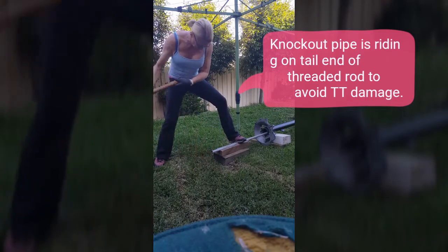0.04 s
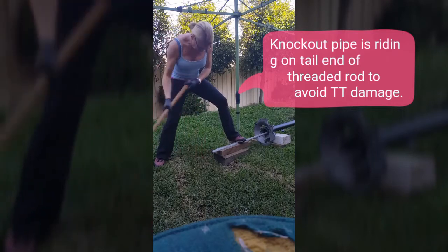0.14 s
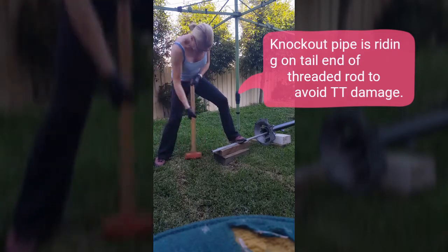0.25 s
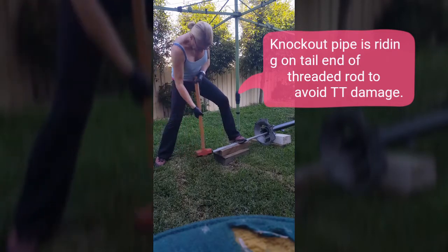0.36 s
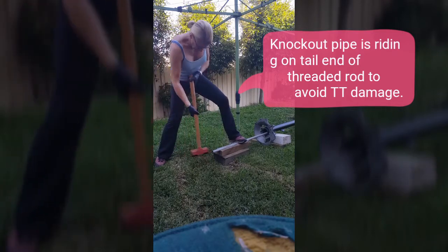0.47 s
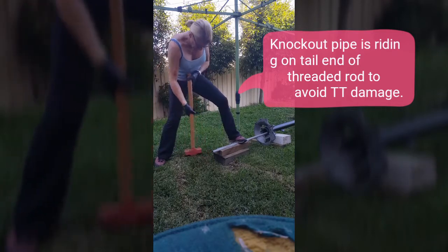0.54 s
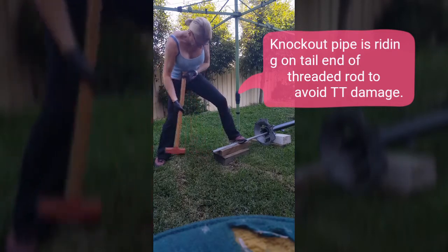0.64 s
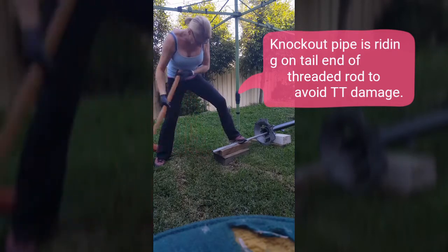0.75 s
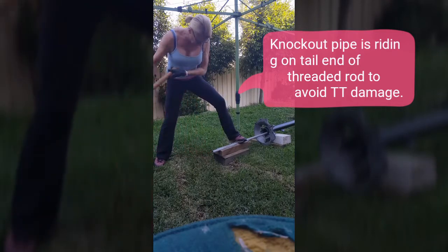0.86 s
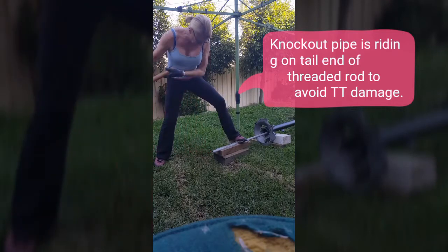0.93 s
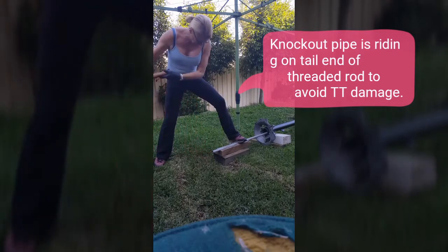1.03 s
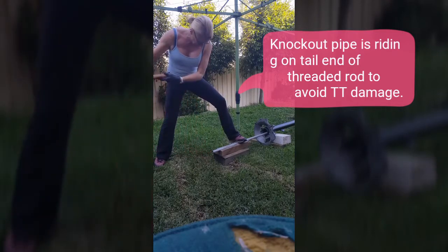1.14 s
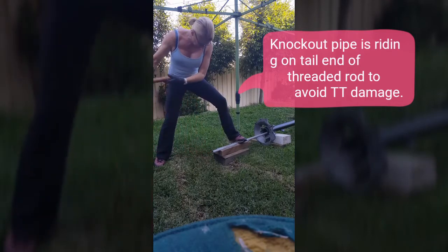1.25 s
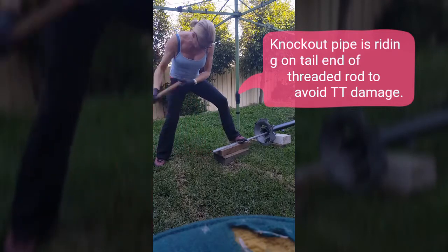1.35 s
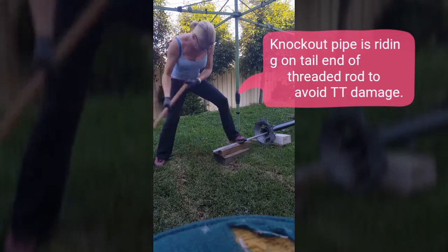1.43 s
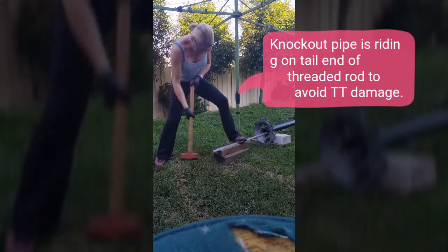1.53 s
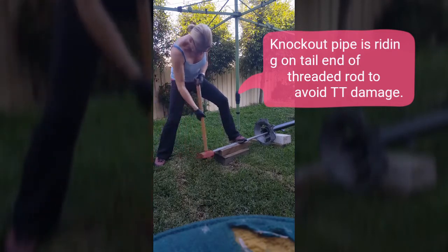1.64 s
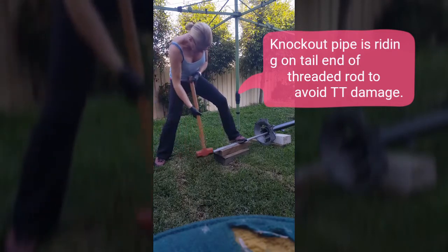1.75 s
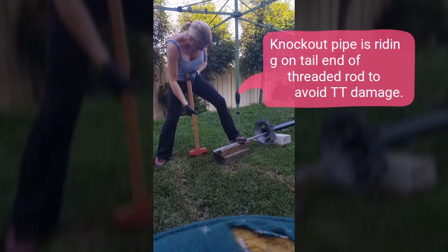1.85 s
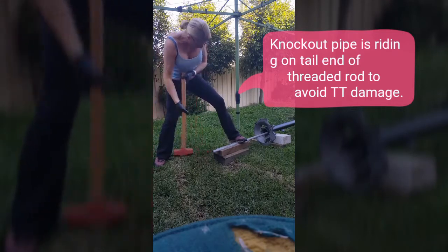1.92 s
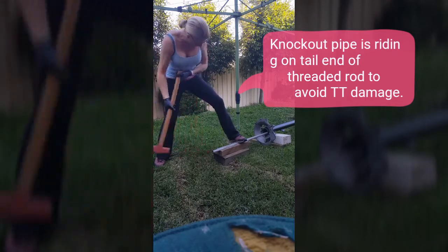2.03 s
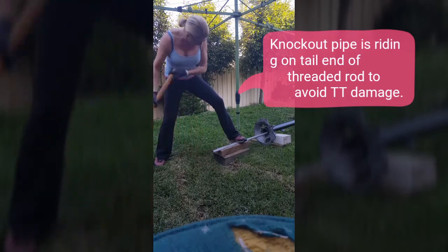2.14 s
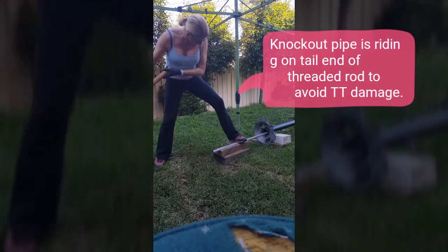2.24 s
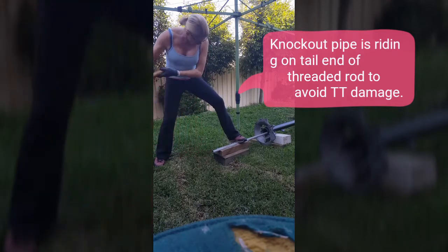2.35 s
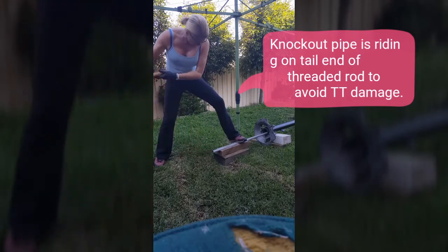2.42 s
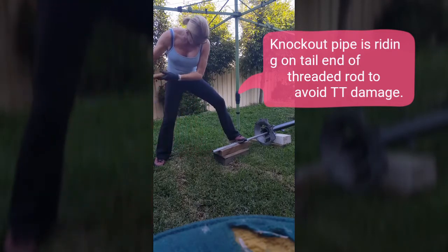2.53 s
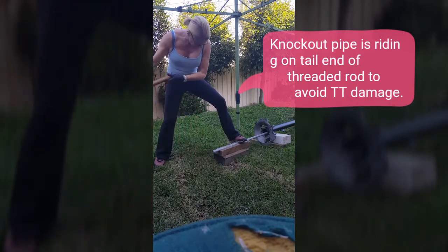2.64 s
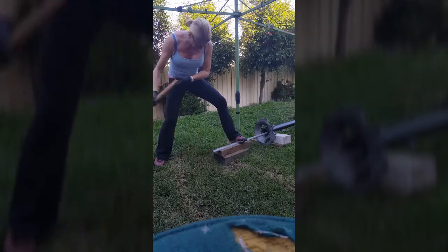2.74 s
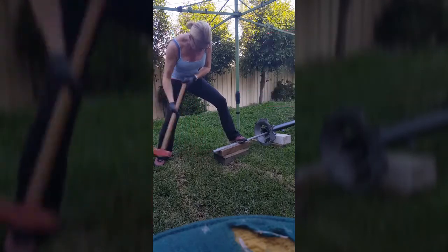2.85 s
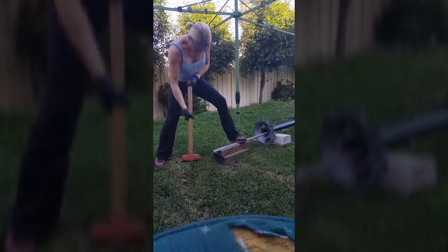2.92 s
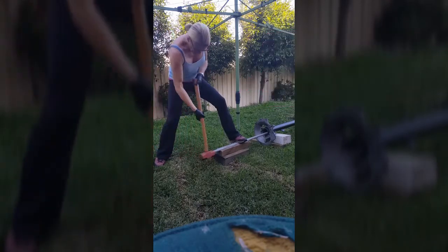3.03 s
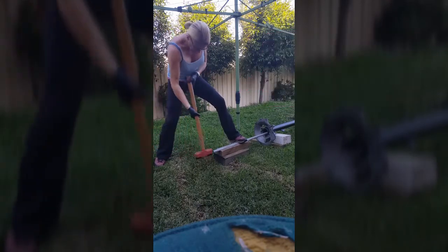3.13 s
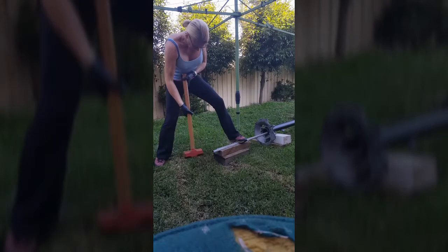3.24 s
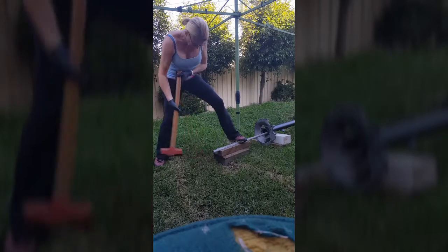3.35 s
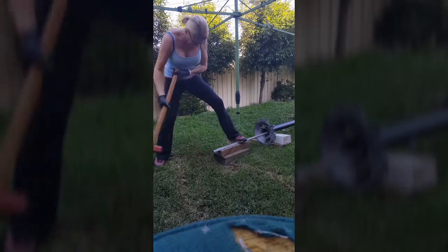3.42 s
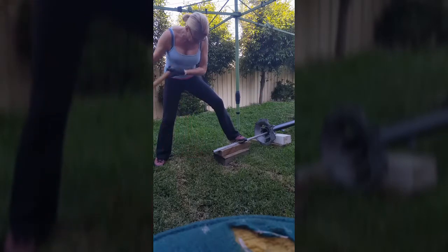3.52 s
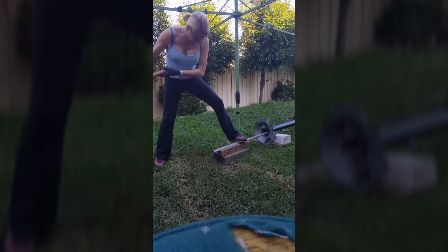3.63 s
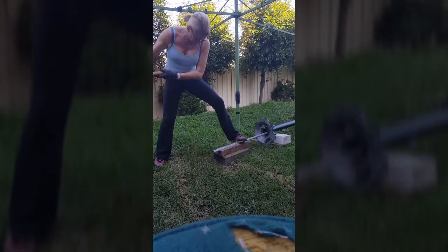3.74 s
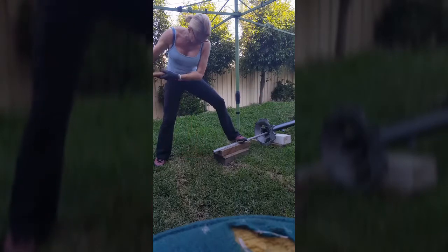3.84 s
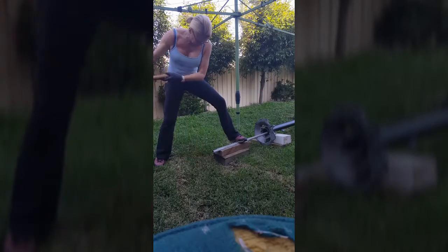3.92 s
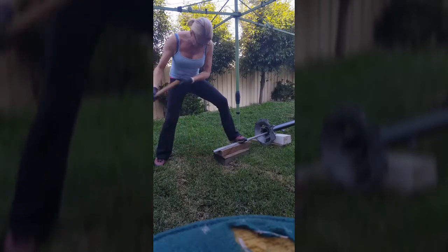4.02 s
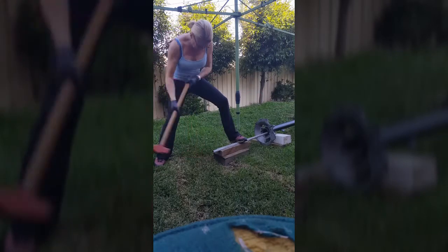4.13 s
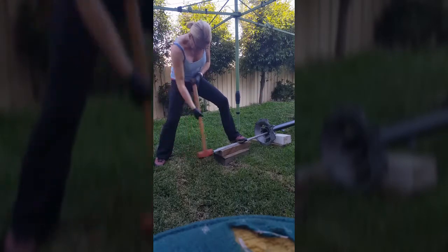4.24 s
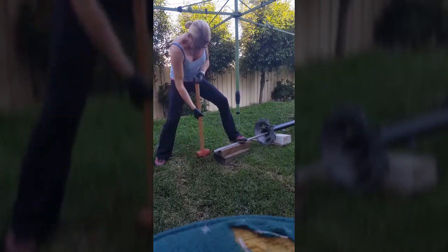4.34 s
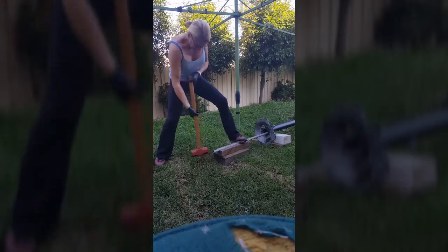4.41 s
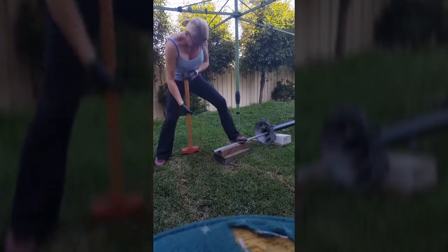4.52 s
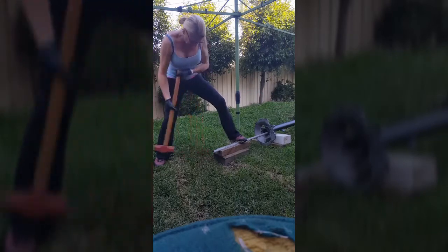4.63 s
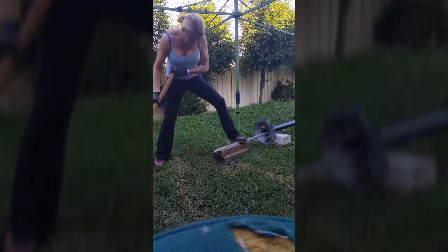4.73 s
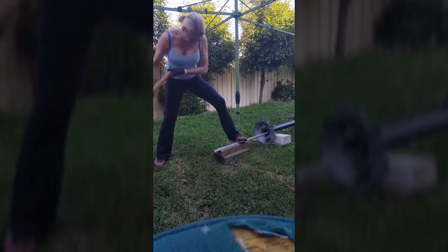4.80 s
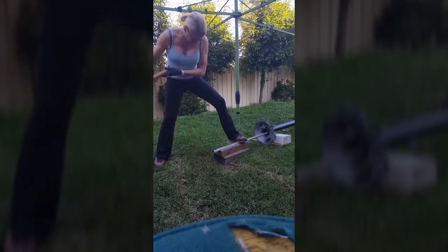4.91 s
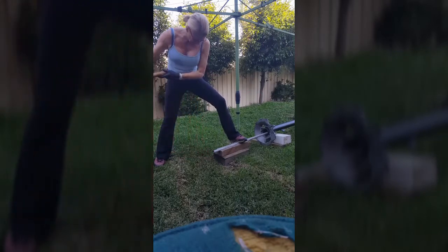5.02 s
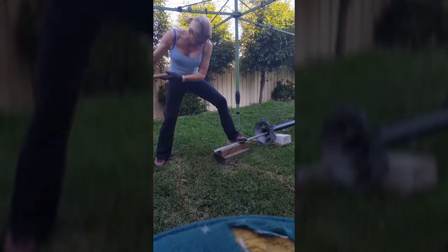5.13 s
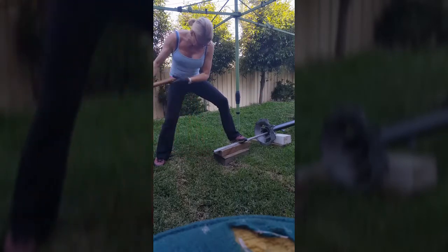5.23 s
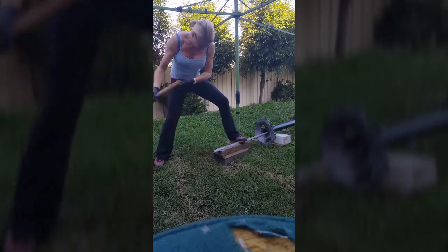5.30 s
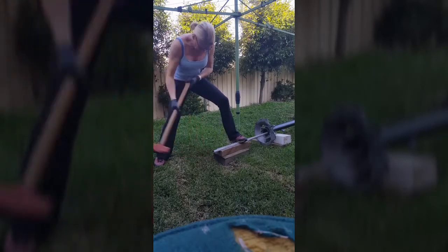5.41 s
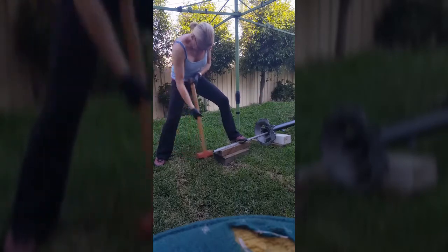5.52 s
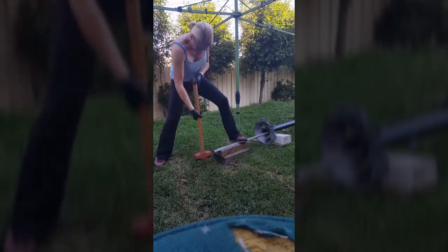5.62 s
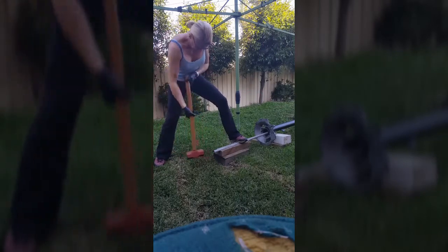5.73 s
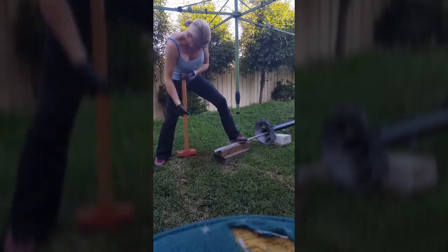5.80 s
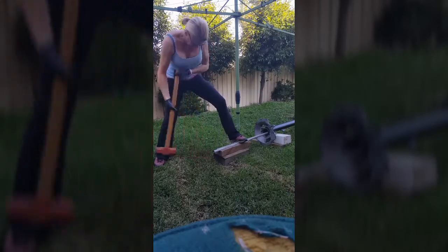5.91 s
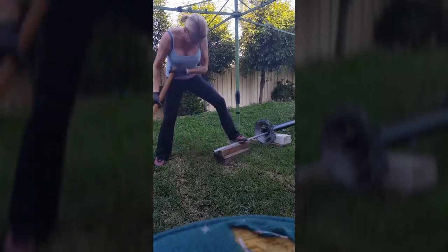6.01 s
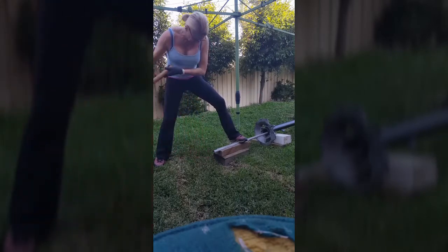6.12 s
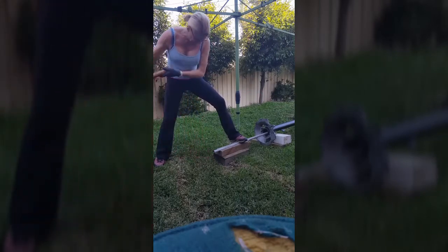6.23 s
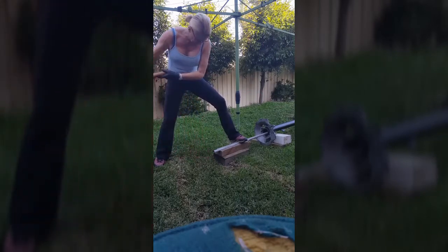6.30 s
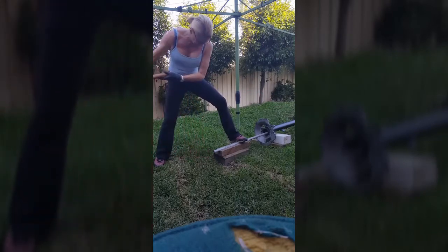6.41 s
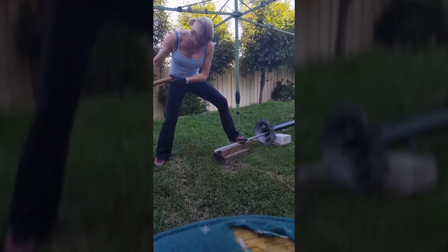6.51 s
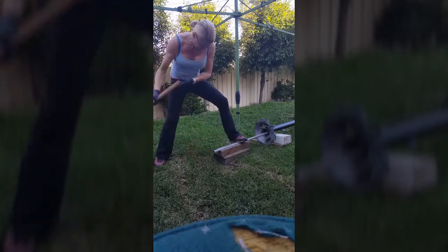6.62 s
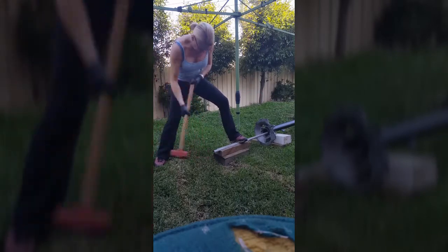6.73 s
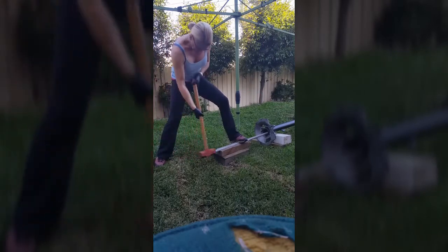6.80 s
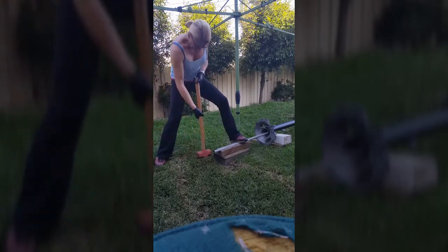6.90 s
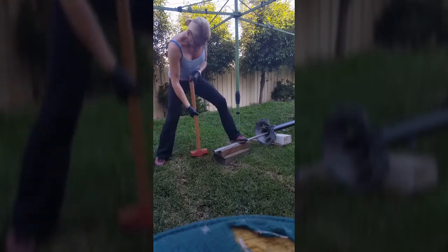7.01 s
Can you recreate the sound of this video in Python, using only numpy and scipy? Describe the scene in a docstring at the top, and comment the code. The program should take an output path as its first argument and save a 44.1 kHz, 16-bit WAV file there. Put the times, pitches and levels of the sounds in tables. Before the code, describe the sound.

Outdoors in a fenced grassy yard, a low neighbourhood hum and a brief clothing rustle lead to a hard sledgehammer blow on a steel pipe. Six blows follow a steady pace of about 1.3 seconds, each a loud crash with a low thud, dense short clang and thin high singing tones. The close microphone overloads, and its automatic level dips the background after each hit.

```python
"""Over an outdoor hum, clothes rustle and the air stirs; then a sledgehammer hits the end of a steel pipe.
Six blows fall in a fenced, grassy yard: each a noise crash and low thud, then decaying modes and dense echoes.
Three thin sine tones of the steel sing on; more rustles and swishes come between blows, later faint gliding hoots.
The recorder's gain control ducks the hum after every blow, and the peaks clip."""
import sys
import numpy as np
from scipy import signal
from scipy.fft import rfft, irfft
from scipy.io import wavfile
from scipy.ndimage import uniform_filter1d, minimum_filter1d

SR = 44100
rng = np.random.default_rng(int(sys.argv[2]) if len(sys.argv) > 2 else 0)


def wrap_up_sound(samples):
    """Save the sound to the file named by the first command line argument, as 16-bit audio."""
    columns = np.atleast_2d(samples).T
    # keep every value between -1 and 1, then stretch to whole-number steps
    tamed = np.clip(columns, -1, 1)
    steps = np.round(tamed * 32767).astype(np.int16)
    wavfile.write(sys.argv[1], SR, steps)


N = 311336

# blows: [t/s, force/dB, bass/dB, bite/dB, treble/dB, favoured f/Hz, favour/dB,
#         low, middle, high singing tone: relative level/dB each]
BLOWS = [(0.465, 0, -2, 1.65, 0.5, 2865, 3.16, -59.5, -59, -57),
         (1.7780, -0.81, -0.59, -1.85, -3, 1584, 3.5, -49, -61, -75.5),
         (3.1481, 0.8, -1, 2.07, 0, 1680, 4, -49, -80, -67.5),
         (4.437, 0.27, 0, -0.5, 2, 1200, 1.7, -53.5, -59.5, -60),
         (5.7127, 0.59, 2, 0.46, -1, 957, 2, -53, -75, -66),
         (6.999, 0.43, 0, 0.096, -1.5, 1780, 2.1, -48, -70.5, -53.5)]
# two microphone ports: [f/Hz, left-right likeness 0..1, left minus right/dB]
PORTS = [(40, .45, 4.5), (70, .65, 2.5), (160, .93, 1), (300, .93, -.8), (600, .75, 1.5), (1100, .7, 6.5),
         (2800, .55, 7.7), (4500, .3, 6), (7000, .3, 11), (8600, .3, 17.5)]


def gain_of(db):
    """Decibels to amplitude factor."""
    return 10 ** (np.asarray(db) / 20)


def evened(x):
    """Scales to rms 1."""
    return x / np.sqrt(np.mean(x ** 2) + 1e-20)


def read(table, hz, axis=1):
    """One table column, interpolated linearly over log frequency."""
    columns = np.transpose(table)
    return np.interp(np.log(hz + 1), np.log(columns[0] + 1), columns[axis])


def add(mix, start_s, sound):
    """Mixes a stereo sound in at start_s, cut at the end of the mix."""
    start = max(round(start_s * SR), 0)
    part = mix[:, start:][:, :sound.shape[1]]
    part += sound[:, :part.shape[1]]


def ports(hz, lead_ms=0.073):
    """Complex gain of each port: the left leads, and the level difference depends on frequency."""
    half_level = gain_of(read(PORTS, hz, axis=2) / 2)
    half_lead = np.exp(1j * np.pi * hz * lead_ms / 10 ** 3)
    half = half_level * half_lead
    return np.array([half, 1 / half])


def noise(colour, size):
    """Stereo noise of rms 1 with a given spectrum, partly alike at the two ports."""
    hz = np.fft.rfftfreq(size, 1 / SR)
    left, other = rfft(rng.standard_normal((2, size)))
    likeness = np.clip(read(PORTS, hz), 0, 1)
    right = likeness * left + np.sqrt(1 - likeness ** 2) * other
    spectra = np.array([left, right]) * ports(hz) * gain_of(read(colour, hz))
    return evened(irfft(spectra, size))


def swell(t, rise_s, sustain_s, t60_s):
    """Envelope: reflections build up, hold the level for a moment, then die away."""
    decay_db = -60 * np.maximum(t - sustain_s, 0) / t60_s
    return (1 - np.exp(-t / rise_s)) * gain_of(decay_db)


def outdoors(hum_db=-57, drift_db=2, rumble_hz=250):
    """Steady neighbourhood hum as coloured noise; only its rumble drifts in level."""
    # hum: [f/Hz, relative level/dB per Hz]
    hum_colour = [(15, -50.5), (25, -15.5), (75, 5), (178, -4.5), (219, -7.5), (411, -12.5), (494, -14),
                  (731, -14.5), (812, -16.5), (1560, -24.5), (4110, -32), (8780, -43), (13000, -52)]
    t = np.arange(N) / SR
    drift_rates_hz = np.geomspace(1.5, 14, 20)
    drift = evened(sum(np.sin(2 * np.pi * (f * t + rng.random())) for f in drift_rates_hz))
    hum = gain_of(hum_db) * noise(hum_colour, N)
    lowpass = 1 / (1 + (np.fft.rfftfreq(N, 1 / SR) / rumble_hz) ** 4)
    rumble = irfft(rfft(hum) * lowpass, N)
    return hum + rumble * (gain_of(drift_db * drift) - 1)


def clothes(rise_s=0.035, grain_db=1.5):
    """Cloth slides in short, grainy strokes as the hammer is drawn back: noise under quick swells."""
    # rustles: [peak t/s, level/dB, fade time constant/s]
    strokes = [(0.086, -50, 0.12), (1.228, -55.5, 0.067), (1.385, -60, 0.059), (6.3, -55, 0.24)]
    # cloth noise: [f/Hz, relative level/dB per Hz]
    cloth_colour = [(180, -38), (300, -11), (877, -3), (1400, -5), (2800, -5), (8360, -20), (13000, -45)]
    t = np.arange(N) / SR
    level = np.zeros(N)
    for peak_s, db, fade_s in strokes:
        before_s = np.minimum(t - peak_s, 0)
        after_s = np.maximum(t - peak_s, 0)
        level += gain_of(db) * np.exp(-(before_s / rise_s) ** 2 / 2 - after_s / fade_s)
    grain = evened(uniform_filter1d(rng.standard_normal(N), size=300))
    return noise(cloth_colour, N) * level * gain_of(grain_db * grain)


def swings(swish_db=-63, build_s=0.054):
    """Arms and handle stir the air ever faster up to each blow: noise that grows exponentially."""
    # air and sleeves: [f/Hz, relative level/dB per Hz]
    air_colour = [(40, -3), (150, 0), (400, -7.5), (800, -8.5), (1500, -18), (4000, -27), (12000, -50)]
    t = np.arange(N) / SR
    speed = sum((t < s) * np.exp(-abs(t - s) / build_s) for s, *_ in BLOWS)
    return gain_of(swish_db) * speed * noise(air_colour, N)


def crash(t, delay_s=0.003, rise_s=0.0018, sustain_s=.008, t60_s=0.064, touch_db=-16):
    """Steel on steel: the hammer face touches faintly, then bites; one short noise burst."""
    # crash: [f/Hz, relative level/dB per Hz]
    crash_colour = [(100, -21.5), (500, -6), (1000, 1.5), (1700, 0.5), (2800, -6.5), (4000, -4.5),
                    (5500, -14), (9000, -31.5), (13000, -31.5)]
    touch = gain_of(touch_db) * swell(t, rise_s, sustain_s, t60_s)
    bite = swell(np.maximum(t - delay_s, 0), rise_s, sustain_s, t60_s)
    return noise(crash_colour, len(t)) * (touch + bite)


def thud(t, hz=150, db=-16, rise_s=.008, t60_s=.05, delay_s=0.005):
    """The blow shoves the pipe against its blocks and the lawn: one short, low sine push."""
    since_s = np.maximum(t - delay_s, 0)
    push = swell(since_s, rise_s, rise_s, t60_s) * np.sin(2 * np.pi * hz * since_s)
    return gain_of(db) * ports(hz)[:, None].real * push


def dying(hz, rise_cycles=2.4, quickest_rise_s=0.0002, t60_s=0.34, absorb_hz=12300):
    """Rise, sustain and t60 (s) of the clang: bass swells last, air and grass absorb the treble."""
    rise_s = quickest_rise_s + rise_cycles / hz
    sustain_s = .026 * (1000 / hz) ** .17  # low notes hold a little longer
    return rise_s, sustain_s, t60_s / (1 + (hz / absorb_hz) ** 2)


def mode(t, hz, db, t60_s, scatter_db, echo_share=0.95, fading_hz=36, linger_db=-32, linger_t60_s=0.43):
    """One decaying mode, heard directly and through echoes that make it waver differently at each port."""
    knots_s = np.arange(128) / fading_hz
    left, other = rng.standard_normal((2, 128)) + 1j * rng.standard_normal((2, 128))
    likeness = read(PORTS, hz) ** 2
    right = likeness * left + np.sqrt(1 - likeness ** 2) * other
    echoes = np.array([np.interp(t, knots_s, z / np.sqrt(2)) for z in (left, right)])
    share = echo_share * hz / (hz + 300)  # long waves waver less
    wavering = np.sqrt(1 - share) + np.sqrt(share) * echoes
    tone = ports(hz)[:, None] * wavering * np.exp(2j * np.pi * (hz * t + rng.random()))
    rise_s, sustain_s, _ = dying(hz)
    linger = gain_of(linger_db) / (1 + (hz / 1800) ** 4)  # low modes ring on faintly
    envelope = swell(t, rise_s, sustain_s, t60_s) + linger * swell(t, .02, 0, linger_t60_s)
    envelope = envelope * np.minimum(10 * (t[-1] - t), 1)  # to zero over the last 0.1 s
    return gain_of(db + scatter_db * rng.standard_normal()) * envelope * tone.real


def ringing(t, wall_hz, low_db=0, high_db=1, wall_db=-1, wall_t60_s=0.25, damping=1.267, count=20000):
    """Main modes and weaker wall modes; every blow shares its energy among them anew."""
    # main modes of the struck steel pipe: [f/Hz, relative level/dB, t60/s before division by damping]
    main_modes = [(62, -9, .4), (114, -5, .36), (163, -2, .28), (225, -7, .27), (283, 0, .27),
                  (350, -8, .26), (470, -6, .28), (535, -3, .27), (599, -8, .28), (636, -8, .28),
                  (904, -1, .35), (950, -7, .29), (1205, -8, .3), (1545, -6, .29), (1620, -5, .36),
                  (1701, -5, .28), (1899, -6, .29), (2195, -9, .3), (2302, -5, .28), (2374, 0, .28),
                  (2430, -2, .26), (2797, -3, .26), (2923, -7, .26), (2978, -7, .27), (3240, -6, .29),
                  (3281, -6, .28), (3567, -11, .29), (3808, -6, .28), (4232, -9, .3), (8358, -20, .22)]
    # higher modes of the pipe wall: [f/Hz, relative level/dB]
    wall_strength = [(1300, -10), (2500, -6.5), (4000, -14.5), (4800, -14.5), (6500, -19.5), (8400, -16.5),
                     (9600, -28.5), (10400, -37), (11300, -23), (13000, -28.5)]
    out = np.zeros((2, len(t)))
    for hz, db, t60_s in main_modes:
        tilt_db = np.interp(hz, [300, 2500], [low_db, high_db])
        out[:, :count] += mode(t[:count], hz, db + tilt_db, t60_s / damping, scatter_db=1.2)
    for hz in wall_hz:
        t60_s = wall_t60_s * rng.uniform(.7, 1.3)
        out[:, :count] += mode(t[:count], hz, read(wall_strength, hz) + wall_db, t60_s, scatter_db=2.0)
    return out


def clang(t, late_db=-34, late_t60_s=0.69, treble_db=-4, treble_hz=4500):
    """Countless close modes and echoes as unevenly bunched noise; a weak tail returns from farther walls."""
    # clang scattered by the yard: [f/Hz, relative level/dB per Hz]
    clang_colour = [(21, -41), (35, -17.5), (167, -7.5), (294, -4.5), (396, -10), (833, -15.5), (897, -6.5),
                    (1010, -13), (2080, -11), (2360, -8), (5070, -19), (8530, -23.5), (10400, -45),
                    (11200, -26.5), (13000, -34)]
    size = len(t)
    hz = np.fft.rfftfreq(size, 1 / SR)
    knots_hz = np.geomspace(1000, SR / 2, 220) - 1000
    ripple_db = np.interp(hz, [400, 3000], [2.5, 5])
    bunching = gain_of(ripple_db * np.interp(hz, knots_hz, rng.standard_normal(len(knots_hz))))
    bunched = evened(irfft(rfft(noise(clang_colour, size)) * bunching, size))
    spectrum = rfft(bunched) * gain_of(treble_db * hz ** 2 / (hz ** 2 + treble_hz ** 2))
    centres_hz = np.geomspace(70, 12000, 7)
    out = np.zeros((2, size))
    for one, centre_hz in zip(np.eye(len(centres_hz)), centres_hz):
        rise_s, sustain_s, t60_s = dying(centre_hz)
        crossfade = np.interp(np.log(hz + 1), np.log(centres_hz), one)
        band = irfft(spectrum * crossfade, size)
        late = gain_of(late_db) / (1 + (centre_hz / treble_hz) ** 2)  # far echoes lose their treble
        envelope = swell(t, rise_s, sustain_s, t60_s) + late * swell(t, 0.021, sustain_s, late_t60_s)
        out += band * envelope
    return out


def landing(hz, bass_db, bite_db, treble_db, favour_hz, favour_db, bass_hz=500, bite_hz=3900, treble_hz=5500):
    """Colour in dB that the place and angle of the hammer face give to a blow."""
    def bump(centre_hz, octaves):
        return np.exp(-(np.log2((hz + 1) / centre_hz) / octaves) ** 2)

    bass = bass_db / (1 + (hz / bass_hz) ** 2)
    treble = treble_db * hz ** 2 / (hz ** 2 + treble_hz ** 2)
    return bass + treble + bite_db * bump(bite_hz, 0.72) + favour_db * bump(favour_hz, 0.15)


def singing(levels_db, size, lift_db=19, early_db=8, early_t60_s=0.24, flutter_db=1.1):
    """Sines that outlast the clang: they drop fast at first and flutter as their echoes mix."""
    # lightly damped tones of the steel: [f/Hz, t60/s, right re left/dB]
    steel_tones = [(1621, 1.7, -12), (6799, 1.5, -12.5), (10930, .9, -8)]
    t = np.arange(size) / SR
    out = np.zeros((2, size))
    for (hz, t60_s, right_db), db in zip(steel_tones, levels_db):
        smoothed = uniform_filter1d(rng.standard_normal(size), size=900)
        flutter = evened(uniform_filter1d(smoothed, size=600))
        fade = swell(t, .003, 0, t60_s) + gain_of(early_db) * swell(t, .003, 0, early_t60_s)
        tone = np.sin(2 * np.pi * hz * t) * fade * gain_of(flutter_db * flutter)
        out += gain_of(db + lift_db) * gain_of([[0], [right_db]]) * tone
    return out


def hammer(modes_db=-9, clang_db=-5, crash_db=0, touch_s=.0025):
    """Every blow: crash, thud, modes and clang, coloured by how it lands, then the singing steel."""
    out = np.zeros((2, N))
    t = np.arange(SR) / SR
    hz = np.fft.rfftfreq(SR, 1 / SR)
    wall_hz = np.linspace(2600, 12900, 58) + rng.uniform(-90, 90, 58)  # same pipe at every blow
    fade_out = np.clip(10 * (1 - t) - 1, 0, 1)
    for s, force_db, *rest in BLOWS:
        colour, tones_db = rest[:5], rest[5:]
        blow = gain_of(crash_db) * crash(t) + thud(t)
        body = gain_of(modes_db) * ringing(t, wall_hz) + gain_of(clang_db) * clang(t)
        add(blow, touch_s, body)
        coloured = irfft(rfft(blow) * gain_of(force_db + landing(hz, *colour)), SR)
        add(out, s - touch_s, coloured * fade_out)
        add(out, s, singing(tones_db, size=2 * SR))
    return out


def hoots(waver=.03):
    """Faint tones from far away: gliding sines with a random pitch waver under half-sine envelopes."""
    # hoots: [t/s, length/s, start f/Hz, end f/Hz, level/dB]
    calls = [(2.929, 0.15, 722, 758, -68), (4.307, .13, 735, 820, -56.5), (6.331, 0.091, 924, 877, -55.5),
             (6.708, 0.22, 775, 695, -61.5), (6.806, 0.076, 620, 642, -59.5)]
    out = np.zeros((2, N))
    for s, length_s, start_hz, end_hz, db in calls:
        size = int(length_s * SR)
        wobble = evened(uniform_filter1d(rng.standard_normal(SR), size=300))[:size]
        pitch_hz = np.linspace(start_hz, end_hz, size) * (1 + waver * wobble)
        tone = ports(start_hz)[:, None] * np.exp(2j * np.pi * np.cumsum(pitch_hz) / SR)
        envelope = np.sin(np.pi * np.arange(size) / size)
        add(out, s, gain_of(db) * tone.real * envelope)
    return out


def scene():
    """The yard at the microphone."""
    return outdoors() + clothes() + swings() + hammer() + hoots()


def gain_control(x, threshold_db=-14, slope=0.65, hold_s=0.71, recover_db_per_s=24):
    """Turns down at once on a loud sound, holds, then creeps back up."""
    power = uniform_filter1d((x ** 2).mean(0), size=260)
    power_db = 10 * np.log10(abs(power) + 1e-12)
    cut_db = slope * np.maximum(power_db - threshold_db, 0)
    half = int(hold_s * SR / 2)
    # largest cut of the past hold_s
    held_db = -minimum_filter1d(-cut_db, 2 * half + 1, origin=half, mode="constant")
    fall_db = np.arange(N) * recover_db_per_s / SR
    recovering_db = np.maximum.accumulate(held_db + fall_db) - fall_db
    return x / gain_of(uniform_filter1d(recovering_db, size=100))


def record(dry, ceiling=1.0, out_db=0, edge_hz=13200):
    """Gain control, rounded clipping of the peaks, then a steep low-pass."""
    level = gain_control(dry) * gain_of(out_db)
    clipped = level / (1 + (level / ceiling) ** 8) ** (1 / 8)
    lowpass = signal.firwin(511, edge_hz, window=("kaiser", 9), fs=SR)
    return signal.oaconvolve(clipped, lowpass[None], "same")


dry = scene()
out = record(dry)
wrap_up_sound(out)
```